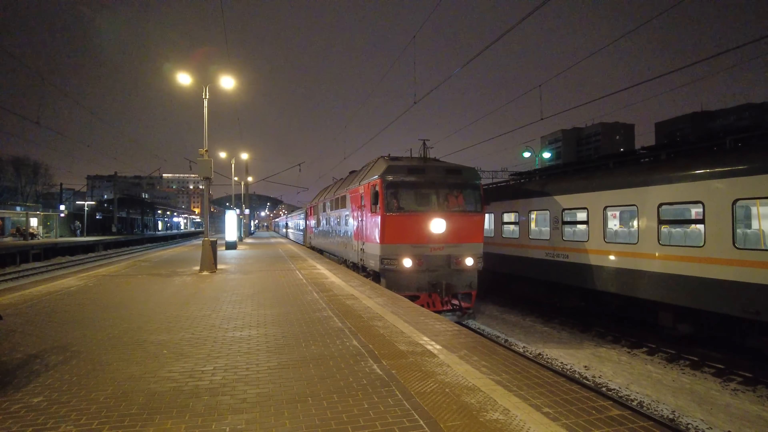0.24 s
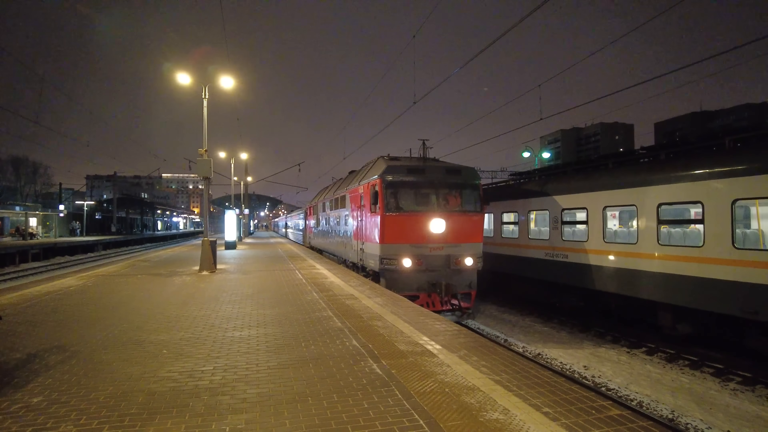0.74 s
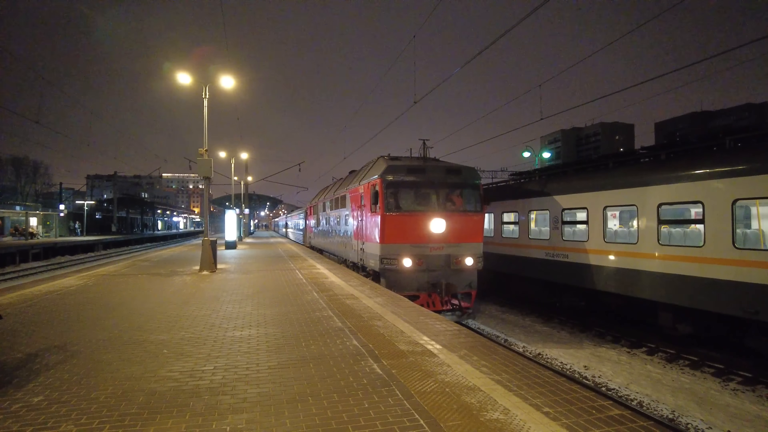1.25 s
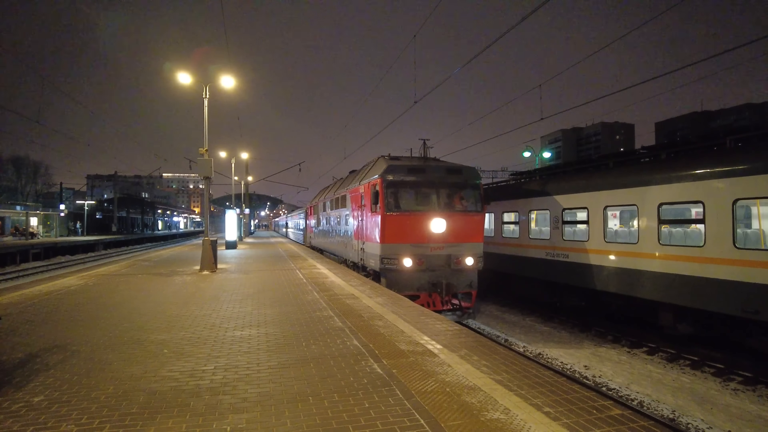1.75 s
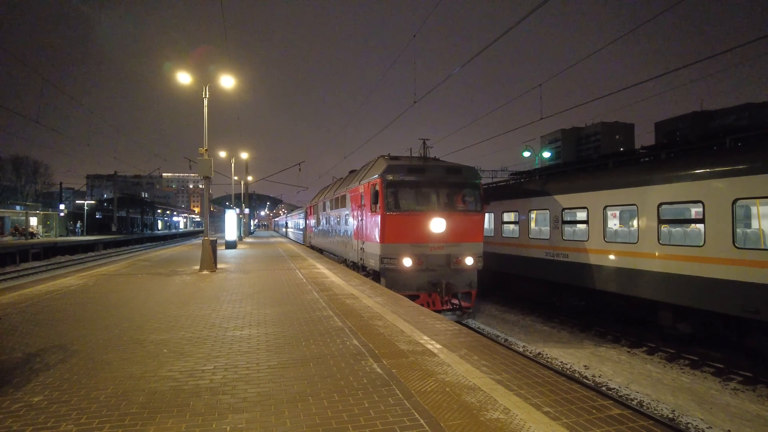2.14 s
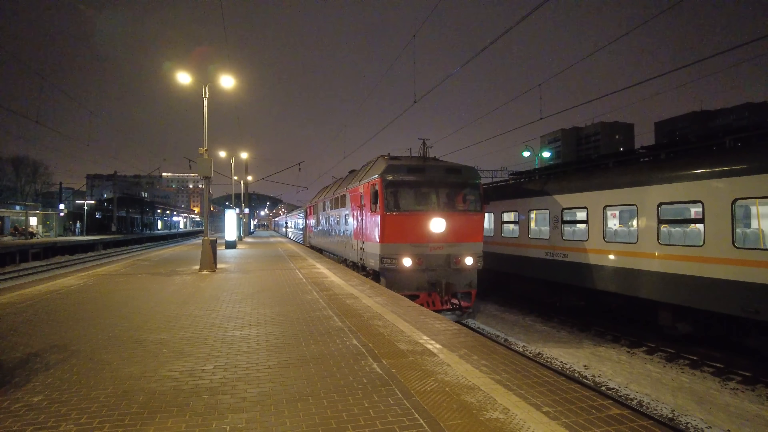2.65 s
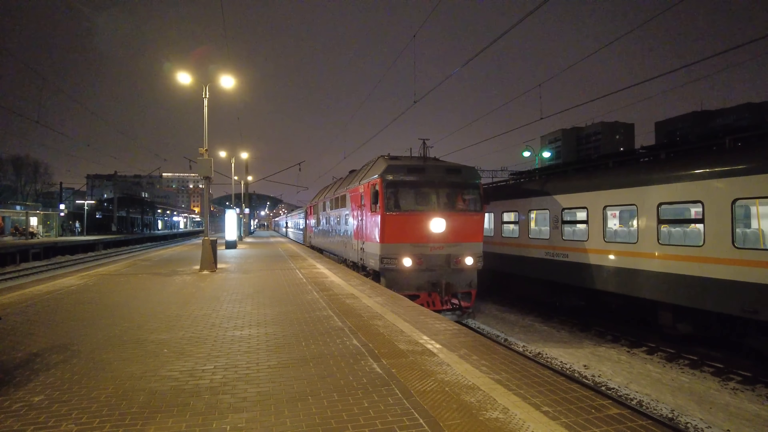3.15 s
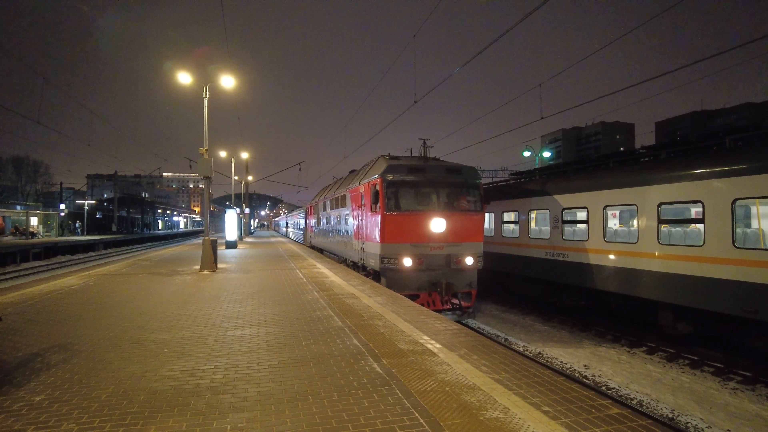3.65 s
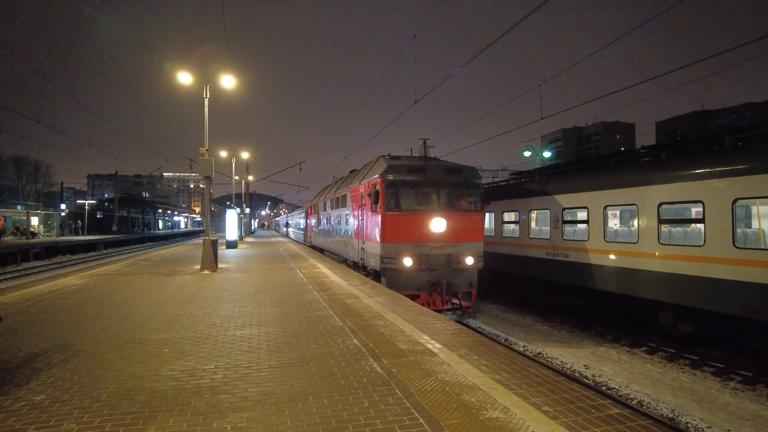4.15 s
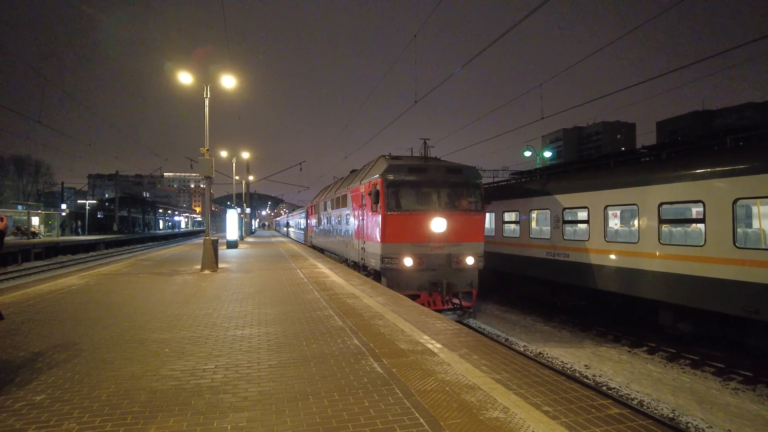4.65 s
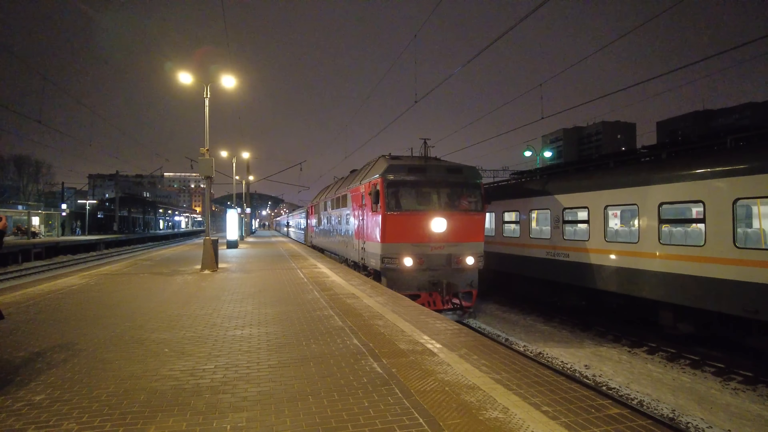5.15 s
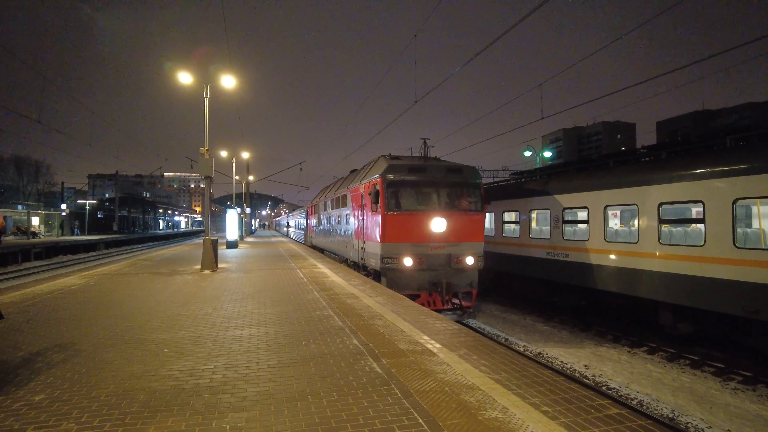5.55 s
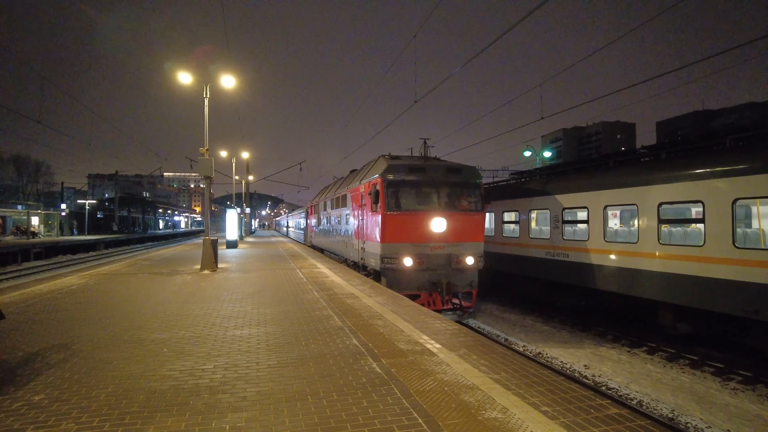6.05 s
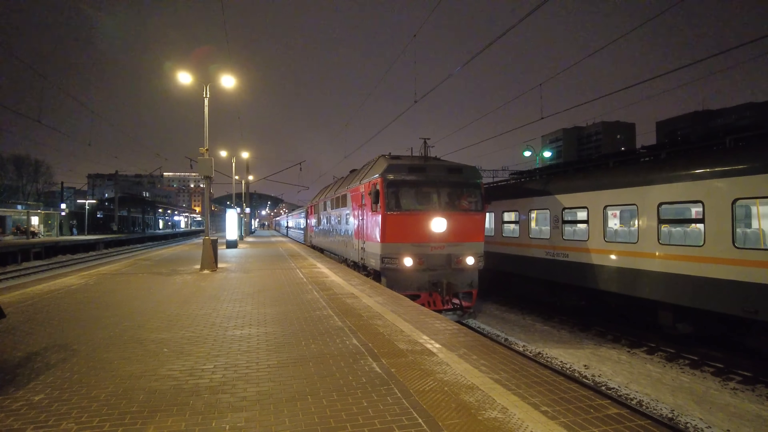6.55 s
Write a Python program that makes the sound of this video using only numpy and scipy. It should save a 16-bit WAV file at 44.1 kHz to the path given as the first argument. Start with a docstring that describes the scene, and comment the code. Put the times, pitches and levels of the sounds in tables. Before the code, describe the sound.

A diesel locomotive idles with a deep throb as compressed air hisses out and slowly fades, followed by faint rattles.

```python
"""A slow, deep throb over a steady roar: a diesel locomotive idles some way off at a night platform.
Its firings repeat every two crank turns, so the exhaust sounds a harmonic series, while gears and a
blower hum in the noise of block and fans; the engine surges once. Just after the start a valve vents
compressed air: the turbulent jet hisses, sings in the resonances of its pipe and dies away. Later,
loose parts rattle faintly and a few dull knocks sound. A microphone housing colours it all."""
import sys
import numpy as np
from scipy import signal
from scipy.fft import rfft, irfft, next_fast_len
from scipy.io import wavfile
from scipy.ndimage import uniform_filter1d

SR = 44100
rng = np.random.default_rng(int(sys.argv[2]) if len(sys.argv) > 2 else 0)


def output_pcm(signal):
    """Save a mono or channel-first signal as 16-bit PCM at the path in sys.argv[1].

    Samples are clipped to [-1, 1] before scaling.
    """
    pcm = np.clip(np.atleast_2d(signal).T, -1, 1) * 32767
    wavfile.write(sys.argv[1], SR, np.round(pcm).astype(np.int16))


N = 299880

MAIN_ORDER, SECOND_ORDER = 9, 13  # strongest harmonics of the four-stroke cycle
# likeness of the air noise at left and right: (frequency [Hz], coherence [ratio])
AIR_COHERENCE = [(60, 0.97), (130, 0.84), (290, 0.63), (640, 0.16), (1410, 1), (3100, 0.59), (6820, 0.26),
                 (15000, 0.37)]


def engine():
    """Four-stroke cycle: its rate, half the crank speed, sets the pitch of all the engine's tones."""
    # idle, surge, governor undershoot: (time [s], speed [rpm], main order [dB], second order [dB])
    running = [(0, 355.3, -17.6, -28), (.5, 354.8, -18.3, -28.3), (.95, 354.6, -16.8, -27.3),
               (1.45, 354.3, -17.9, -29.3), (2.5, 354.4, -18.1, -27.5), (2.95, 354.3, -16.6, -26.8),
               (3.2, 361.1, -16.6, -25.8), (3.45, 365.3, -15.7, -26.7), (3.7, 364.7, -17.3, -33.4),
               (3.95, 360.8, -20.8, -31), (4.2, 356.6, -18.6, -27.7), (4.45, 352.9, -19.5, -34.8),
               (4.7, 351.2, -21.3, -28.5), (4.95, 349.5, -15.8, -24.2), (5.45, 349.3, -19.8, -26.1),
               (5.8, 349.6, -17.3, -24), (6.2, 350.5, -18.3, -25), (6.45, 351.1, -16.3, -24.6),
               (6.8, 351.7, -15.8, -24.3)]
    rpm, main_db, second_db = curves(running)
    cycles = np.cumsum(rpm / 120) / SR
    tones = exhaust(rpm, cycles, main_db, second_db) + gears(rpm, cycles)
    return np.sqrt(2) * tones + rumble(main_db) + roar(cycles)


def exhaust(rpm, cycles, main_db, second_db):
    """Harmonic series: uneven firings that repeat each cycle give two strong orders and many weak ones."""
    # the surge shifts the load among the cylinders: (order [per cycle], before [dB], after [dB])
    weak_orders = [(5, -55, -48), (6, -48, -41), (7, -36, -33), (8, -51, -47), (10, -34, -33),
                   (11, -40, -52), (12, -33, -37), (14, -53, -36), (15, -35, -39), (16, -38.5, -37),
                   (17, -35, -37), (18, -36, -41), (19, -45, -49), (20, -37, -37), (21, -46, -49),
                   (22, -45, -35), (23, -44, -43), (24, -44, -43), (25, -44, -41), (26, -49, -46),
                   (27, -60, -47)]
    surged = ramp(start_s=2.85, lasts_s=.3)
    pull_rpm_per_s = np.maximum(uniform_filter1d(np.gradient(rpm) * SR, size=8000), 0)
    orders = [(MAIN_ORDER, main_db, 0), (SECOND_ORDER, second_db, 0)]
    for order, before, after in weak_orders:
        db = before + (after - before) * surged + .09 * pull_rpm_per_s + .7 * drift(3.3)
        slip_turns = .035 * drift(1.2)  # firings come early or late
        orders.append((order, db, slip_turns))
    return sum(gain_of(db) * np.sin(2 * np.pi * (order * cycles + slip_turns + rng.random()))
               for order, db, slip_turns in orders)


def gears(rpm, cycles):
    """Tooth meshing and blade passing: tones locked to the crank, their phase modulated by backlash."""
    # two gears, then the blower and its harmonics: (order [per cycle], slow [dB], idle [dB], fast [dB])
    orders = [(50.3, -50, -45, -41.5), (75.1, -46.5, -51, -50), (92.4, -47.5, -51, -60),
              (2 * 92.4, -67, -60, -63), (3 * 92.4, -72, -55, -66), (4 * 92.4, -60.5, -67, -68)]
    speeds_rpm = 351.5, 354.4, 365  # slow, idle, fast
    lash_turns = .06 * drift(4.5)
    tones = np.zeros(N)
    for order, *levels_db in orders:
        level_db = np.interp(rpm, speeds_rpm, levels_db) + 3.2 * drift(2.5)
        tones += gain_of(level_db) * np.sin(2 * np.pi * (order * cycles + lash_turns))
    return tones


def rumble(main_db):
    """Low-frequency noise whose envelope follows the main exhaust order."""
    # deep bass: (frequency [Hz], relative density [dB])
    spectrum = [(5, -14), (14, -7), (30, -5), (48, 0), (76, -6), (86, -20), (130, -40)]
    level_db = -35.5 + .5 * (main_db - main_db.mean())
    return gain_of(level_db) * noise(spectrum, [(20, .9), (130, .9)], 1.1, .1, size=8192)


def roar(cycles):
    """Amplitude modulation: the broadband noise of block and fans pulses with the strongest firings."""
    # block and fans: (frequency [Hz], relative density [dB])
    spectrum = [(47, -29), (80, -8), (100, -6), (125, -7), (170, -9.5), (290, -10.5), (340, -19),
                (367, -16), (400, -22), (460, -19.5), (700, -22), (820, -20.5), (945, -20), (985, -25.5),
                (1500, -26.5), (2300, -35), (3100, -40.5), (6000, -50.5), (15500, -63)]
    # slow swell: (time [s], level [dB])
    envelope = [(0, -32.5), (1.5, -33.5), (2.7, -33), (3.3, -31), (4.2, -33.5), (4.8, -33), (5.3, -32.5),
                (5.7, -32), (6.2, -33.5), (6.8, -31.5)]
    # likeness at left and right: (frequency [Hz], coherence [ratio])
    coherence = [(60, 0.89), (130, 0.94), (290, 0.95), (640, 0.43), (1410, 0.77), (3100, 0.52),
                 (6820, 0.065), (15000, 0.18)]
    phase = 2 * np.pi * cycles
    throb_db = .82 * np.cos(MAIN_ORDER * phase) + .5 * np.cos((SECOND_ORDER - MAIN_ORDER) * phase)
    return gain_of(curves(envelope)[0] + throb_db) * noise(spectrum, coherence, 1.31, .66, size=2048)


def vent():
    """Discharge of a reservoir: air rushes through a valve and its pipe, fading as the pressure falls."""
    # the valve cracks open, opens fully, then the reservoir empties: (time [s], level [dB])
    envelope = [(.36, -47), (.45, -42.5), (.66, -42), (.94, -38.5), (1.4, -36.5), (2.1, -40), (2.86, -42.5),
                (3.3, -46), (3.92, -50), (5.3, -59.5), (6.8, -66)]
    jet_db = curves(envelope)[0]
    flow_db = jet_db - jet_db.max()  # 0 at full flow
    opened = ramp(start_s=.372, lasts_s=.028)
    throttled = (1 - ramp(start_s=.46, lasts_s=.86)) ** 2  # 0 once fully open
    return opened * (jet(jet_db, throttled) + pipe(flow_db, throttled) + valve(flow_db, throttled))


def jet(jet_db, throttled):
    """Turbulent mixing: a wide hiss, thin while the valve is half open, duller as the pressure falls."""
    # hiss: (frequency [Hz], relative density [dB])
    spectrum = [(900, -15.5), (2000, -0.5), (4300, -0.5), (6200, -5), (9000, -7), (12400, -8), (14000, -10),
                (15700, -11)]
    fall_db = np.maximum.accumulate(jet_db[::-1])[::-1] - jet_db.max()  # the pressure only drops
    tilt = .14 * fall_db + 2.5 * throttled
    return gain_of(jet_db) * noise(spectrum, AIR_COHERENCE, .91, .78, size=512, db_per_octave=tilt)


def pipe(flow_db, throttled):
    """Air-column resonance: flow noise excites the pipe's modes, each wavering on its own."""
    # flow noise in the pipe: (frequency [Hz], relative density [dB])
    spectrum = [(600, -12.5), (850, -12.5), (1280, -1.5), (1450, -5.5), (1800, -2.5), (2100, -13),
                (3300, -22.5), (4000, -52)]
    # air column: (frequency [Hz], bandwidth [Hz], relative level [dB])
    modes = [(1432, 55, 0), (1602, 36, 3), (1757, 38, 2), (1938, 24, -1)]
    air = noise(spectrum, AIR_COHERENCE, .87, .71)
    song = np.zeros((2, N))
    for hz, width, db in modes:
        swell = gain_of(db + 1.2 * drift(3.0))
        song += swell * unit_rms(resonate(air, hz + 7 * drift(2.5), width))
    blend = unit_rms(air) + gain_of(2.6 + .28 * flow_db) * unit_rms(song)
    level_db = -43 + .45 * flow_db - 11.5 * throttled + .48 * drift(11.0)
    return gain_of(level_db) * unit_rms(blend)


def valve(flow_db, throttled):
    """Orifice noise: a bright band while half open, and a higher one that outlasts the jet."""
    # half-open edge and nozzle, each: (frequency [Hz], relative density [dB])
    edge_band = [(3200, -29), (4400, -6), (5500, 2), (6800, -6), (8500, -12)]
    nozzle_band = [(11000, -22), (12000, -1), (12600, 0.5), (13300, -5), (14500, -16)]
    edge = gain_of(-50.5) * np.sqrt(throttled) * noise(edge_band, AIR_COHERENCE, .92, .95, size=512)
    nozzle = gain_of(-60 + .68 * flow_db) * noise(nozzle_band, AIR_COHERENCE, .96, .93, size=512)
    return edge + nozzle


def rattles():
    """Impact excitation: a loose part rings as it bounces unevenly; many faint taps fill the gaps."""
    # landings: (time [s], low modes [dB], middle modes [dB], high modes [dB])
    landings = [(4.07, -62.5, -65, -58), (4.66, -54, -62, -60), (4.926, -47, -62, -54),
                (5.006, -56, -65, -55), (5.05, -59, -64, -58), (5.082, -48, -58, -58),
                (5.22, -59, -57, -66), (5.265, -48, -53, -61), (5.339, -53.5, -62, -59),
                (5.417, -57, -62, -55), (5.4594, -52.5, -62, -55), (5.516, -51, -62, -63),
                (5.537, -53, -50, -62), (5.653, -58, -61, -58), (5.698, -61, -48, -59),
                (5.886, -56, -52, -60), (5.951, -57, -47.5, -63), (5.976, -57, -51, -61),
                (6.0, -58, -52, -59), (6.105, -60, -60, -59), (6.1479, -55, -63, -62),
                (6.227, -61, -46, -60.5), (6.31, -54, -58, -63), (6.365, -53, -62, -65),
                (6.39, -58, -64, -57), (6.407, -49, -64, -62), (6.453, -50, -58, -64),
                (6.502, -53, -58, -58.5), (6.566, -58, -55.5, -64.5), (6.61, -52, -65, -67),
                (6.643, -47, -58, -53), (6.682, -50, -64, -57), (6.722, -58, -61, -63),
                (6.751, -46, -62, -45)]
    # loose part: (group [index], frequency [Hz], relative level [dB], bandwidth [Hz])
    modes = [(0, 2720, -5, 320), (0, 3050, 0, 300), (0, 3280, -2, 300), (1, 3700, 0, 350),
             (1, 4250, -1, 350), (1, 4900, -6, 350), (2, 5600, -1, 280), (2, 5850, -3, 320),
             (2, 6380, -9, 300)]
    # faint taps: (low modes [dB], middle modes [dB], high modes [dB])
    tap_db = [-61.5, -63.5, -61]
    landings = np.array(landings)
    bounces, mean_gap_s, bounce_loss_db, taps_per_s = 5, .0045, 1.3, 60
    strike_spread_db, landing_spread_db = 5, 6
    gaps = mean_gap_s * rng.uniform(.5, 1.5, (len(landings), bounces))
    bounce_s = landings[:, :1] + np.cumsum(gaps, axis=1) - gaps[:, :1]
    at = np.minimum(np.round(bounce_s * SR).astype(int), N - 1)
    taps = rng.random(N) < taps_per_s / SR
    taps = taps + .96 * np.roll(taps, 185) + .5 * np.roll(taps, 420)
    out = np.zeros(N)
    for group, hz, db, width in modes:
        blows = taps * gain_of(tap_db[group] + strike_spread_db * (rng.random(N) - .5))
        level_db = landings[:, 1 + group, None] - bounce_loss_db * np.arange(bounces)
        # each landing spot favours other modes
        level_db += landing_spread_db * (rng.random((len(landings), 1)) - .5)
        level_db -= strike_spread_db * rng.random(at.shape)
        np.add.at(blows, at, gain_of(level_db) * rng.choice([-1, 1], at.shape))
        out += signal.oaconvolve(blows, gain_of(db) * ring(hz, width))[:N]
    reflection = .96 * np.roll(out, 70)  # from a nearby wall, on the right
    return np.array([out, .38 * out + reflection])


def knocks():
    """Damped vibration: three modes of the block ring briefly at each dull knock."""
    # blows: (time [s], level [dB], boost of the top mode [dB])
    blows = [(5.986, -39.5, 1), (6.165, -45, 3), (6.497, -47, 9), (6.579, -47, 8)]
    # block: (frequency [Hz], relative level [dB], bandwidth [Hz])
    modes = [(545, 0, 60), (720, -4, 90), (860, -1, 60)]
    low, middle, top = [gain_of(db) * ring(hz, width) for hz, db, width in modes]
    out = np.zeros(N)
    for s, db, top_db in blows:
        out[round(s * SR):][:len(top)] += gain_of(db) * (low + middle + gain_of(top_db) * top)
    return out


def ring(hz, width):
    """Damped mode with a soft onset: the wider its band, the faster it decays."""
    t = np.arange(3000) / SR
    decay = np.pi * width * t
    return np.e * decay * np.exp(-decay) * np.sin(2 * np.pi * hz * t)


def resonate(x, hz, width):
    """Heterodyne resonator: shifts the moving frequency hz to zero, smooths, and shifts back."""
    carrier = np.exp(2j * np.pi * np.cumsum(hz) / SR)
    pole = np.exp(-np.pi * width / SR)
    return 2 * (carrier * signal.lfilter([1 - pole], [1, -pole], x / carrier)).real


def noise(spectrum, coherence, patchy_db, flicker_db, size=1024, db_per_octave=np.zeros(N)):
    """Partly coherent stereo noise with drifting spectral patches, broad flicker and a moving tilt."""
    frames, hz = 4 * N // size + 5, np.fft.rfftfreq(size, 1 / SR)
    hz = hz[hz < 1.3 * spectrum[-1][0]]
    draws = rng.standard_normal((frames, len(hz), 6), dtype=np.float32).T
    left_re, left_im, apart_re, apart_im, patches, flicker = draws
    patches = unit_rms(uniform_filter1d(uniform_filter1d(patches, size=14, axis=0), size=10, axis=1))
    flicker = unit_rms(uniform_filter1d(flicker, size=90, axis=0))
    alike = np.clip(at_hz(coherence, hz), -1, 1)[:, None]
    left = left_re + 1j * left_im
    right = alike * left + np.sqrt(1 - alike ** 2) * (apart_re + 1j * apart_im)
    octaves = np.log2(np.clip(hz, 1, 9000) / 9000)  # the tilt acts below 9 kHz
    frame_at = np.minimum(np.arange(frames) * size // 4, N - 1)
    tilt_db = np.outer(octaves, db_per_octave[frame_at])
    field = gain_of(at_hz(spectrum, hz)[:, None] + patchy_db * patches + flicker_db * flicker)
    field *= gain_of(tilt_db) / np.sqrt(np.sum(field ** 2) / frames)
    bins = np.zeros((2, size // 2 + 1, frames), np.complex64)
    bins[:, :len(hz)] = np.array([left, right]) * field
    return signal.istft(bins, nperseg=size, noverlap=3 * size // 4)[1][:, :N]


def drift(top_hz):
    """Slow random modulation: sines of random phase up to top_hz, rms 1."""
    t = np.arange(0, N + 200, 200) / SR
    rates_hz = top_hz * np.geomspace(.1, 1, num=16)
    slow = sum(np.sin(2 * np.pi * (hz * t + rng.random())) / np.sqrt(hz) for hz in rates_hz)
    return np.interp(np.arange(N) / SR, t, unit_rms(slow))


def ramp(start_s, lasts_s):
    """Linear rise from 0 to 1."""
    return np.clip((np.arange(N) / SR - start_s) / lasts_s, 0, 1)


def curves(rows):
    """Linear interpolation of a table's columns over time."""
    s, *columns = np.transpose(rows)
    return [np.interp(np.arange(N) / SR, s, column) for column in columns]


def at_hz(points, hz):
    """Interpolation of a table on a log-frequency axis."""
    known_hz, value = np.transpose(points)
    return np.interp(np.log(hz + 1), np.log(known_hz + 1), value)


def gain_of(db):
    """Decibels to amplitude ratio."""
    return 10 ** (np.asarray(db) / 20)


def unit_rms(x):
    """Normalisation to rms 1."""
    return x / np.sqrt(np.mean(x ** 2) + 1e-20)


def scene():
    """Superposition of all sources, in stereo."""
    return engine() + vent() + rattles() + knocks()


def record(dry):
    """Linear filtering: the housing colours the sound, the right port gets more deep bass; a low-pass."""
    # housing response: (frequency [Hz], gain [dB])
    housing = [(1000, 0), (1090, -1), (1130, -5.5), (1195, -9), (1225, -5), (1330, -1), (1785, 0),
               (1815, -5), (1950, -5), (3250, -2), (3650, -8), (4300, -3), (4900, -7), (6300, -5),
               (7100, -12), (8000, -10), (9000, -12), (11000, -9), (11600, -12), (12400, -8),
               (13500, -11.5)]
    # balance of the ports: (frequency [Hz], left over right [dB])
    balance = [(25, -3.9), (45, -2.8), (70, -1.2), (130, -.1), (700, .8), (2400, 0), (6000, -.5),
               (15000, -1.3)]
    size = next_fast_len(N + 8192)
    hz = np.fft.rfftfreq(size, 1 / SR)
    half_db = at_hz(balance, hz) / 2
    response = gain_of(at_hz(housing, hz) + [half_db, -half_db])
    ports = irfft(rfft(dry, size) * response, size)[:, :N]
    low_pass = signal.firwin(1023, cutoff=15745, window=("kaiser", 9), fs=SR)
    return signal.oaconvolve(ports, low_pass[None], "same")


dry = scene()
out = record(dry)
output_pcm(out)
```